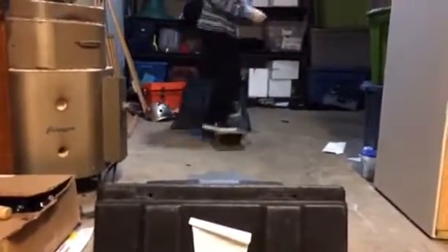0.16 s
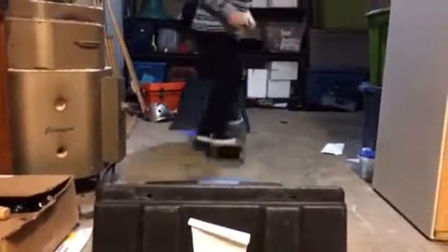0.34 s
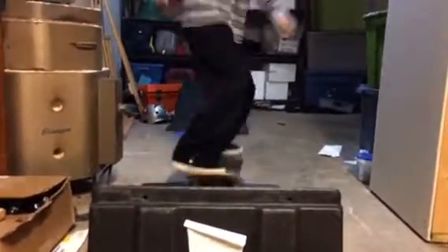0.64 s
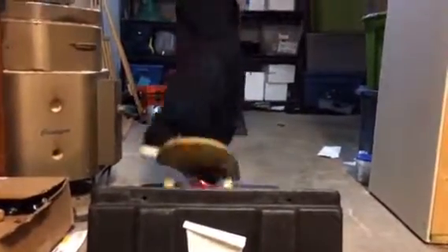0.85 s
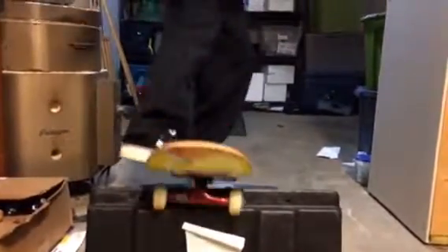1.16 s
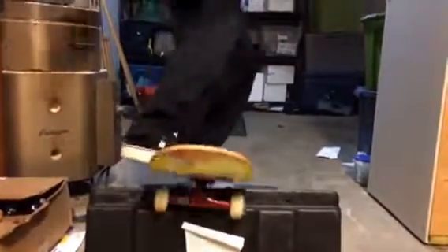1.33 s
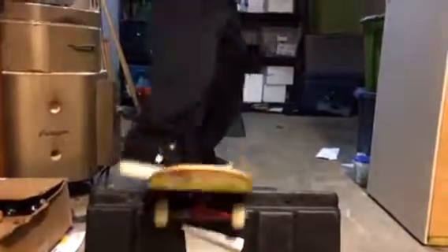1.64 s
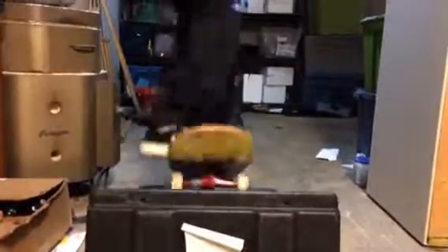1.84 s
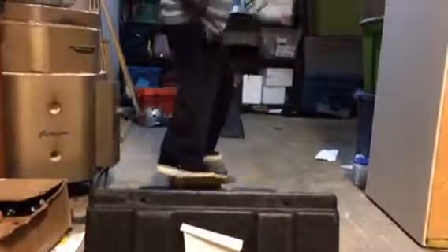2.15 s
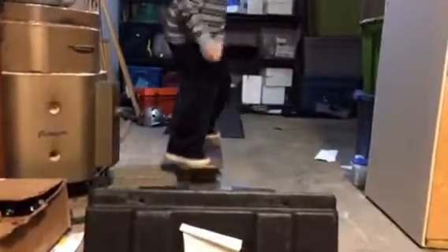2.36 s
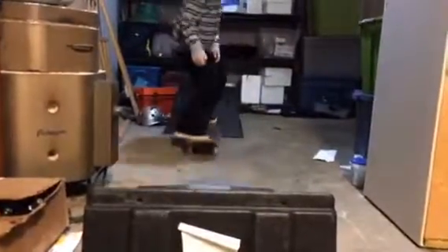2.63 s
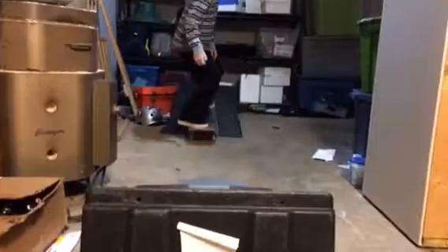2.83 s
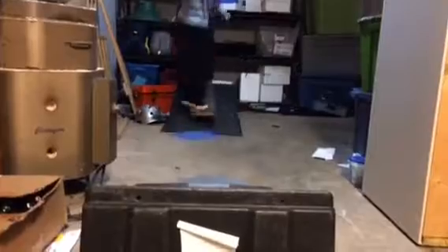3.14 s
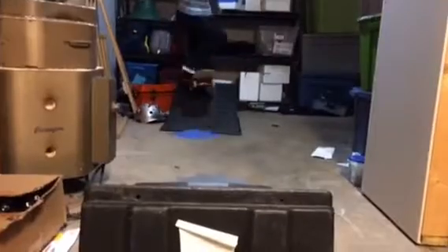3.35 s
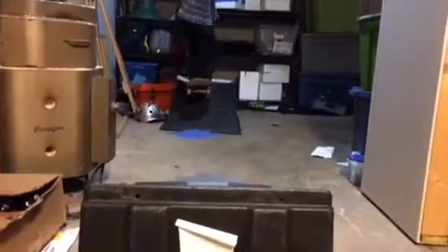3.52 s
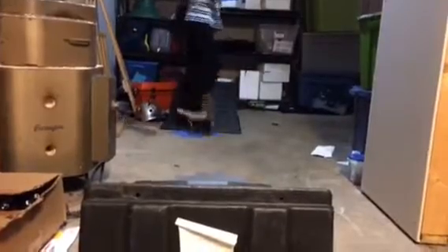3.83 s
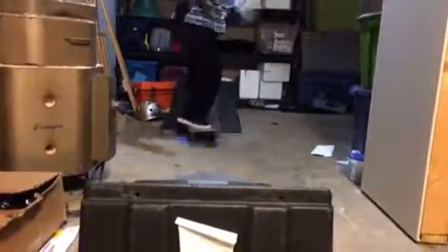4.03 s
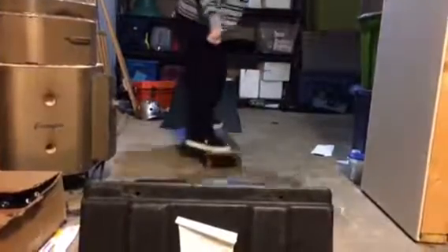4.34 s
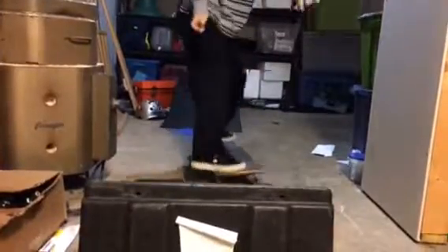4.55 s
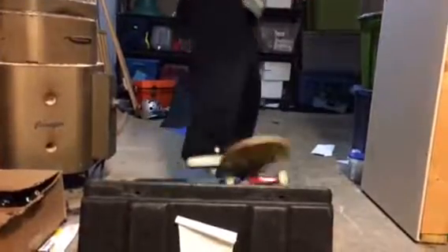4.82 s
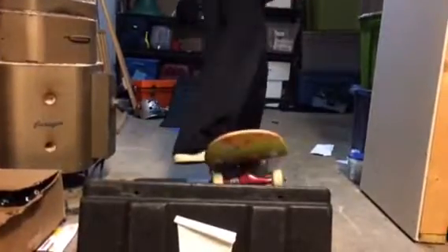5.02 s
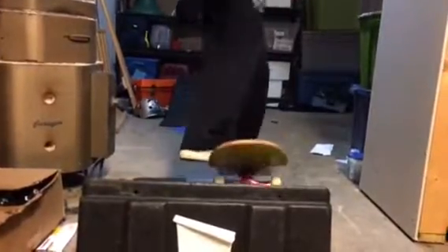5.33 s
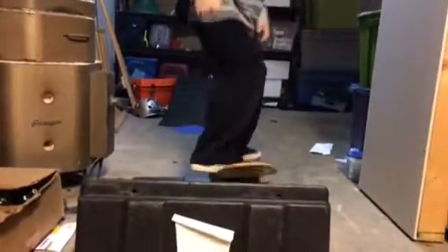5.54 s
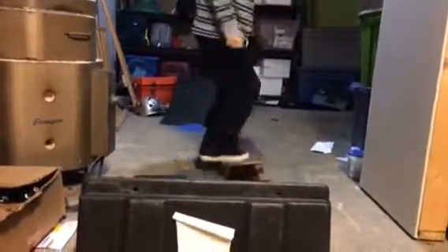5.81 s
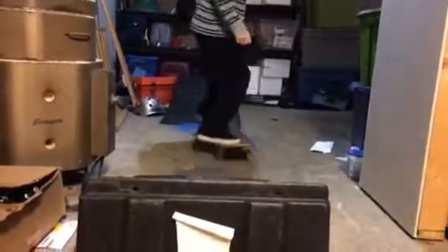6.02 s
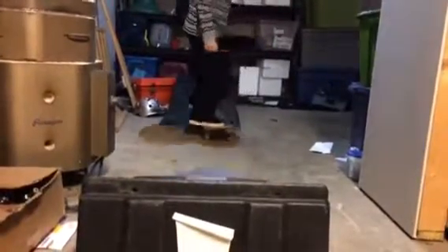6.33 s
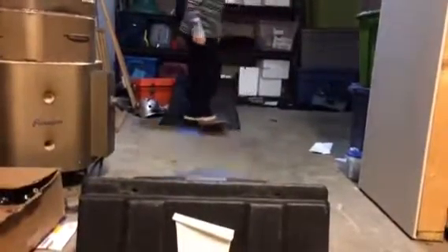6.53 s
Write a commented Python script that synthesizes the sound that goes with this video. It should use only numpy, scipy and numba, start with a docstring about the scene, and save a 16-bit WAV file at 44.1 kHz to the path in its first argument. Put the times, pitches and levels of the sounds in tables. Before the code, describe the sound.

A skateboard rolls between two low hollow ramps in a cluttered storage room, heard on one microphone with a short echo. It starts by rumbling off the far ramp, wheels roaring on concrete and bearings faintly hissing. Axles clack in pairs around 0.2 and 0.7 seconds, and the wheels drum up the near ramp. From 1 to 2 seconds the rolling drops while the deck slaps and thuds through a turn, hardest near 1.6. More clacks follow around 2.3, then a loud rumble and sharp clacks with metallic pings near 3 as it climbs the far ramp. A sharp knock at 3.5 marks the distant turn. The board clacks down at 4, reaches the near ramp around 4.7 and turns with low thumps right by the microphone just after 5. It drums down, clacks at 5.7 and 5.9, and rolls away with a lighter clack at 6.4.

```python
"""A skateboard shuttles between two low hollow ramps in a cluttered storage room, heard on one microphone.
It rumbles off the far ramp some 3.5 m away, wheels roaring on the concrete, bearings hissing. Axles
clack over the lips, the wheels drum up the near ramp and the deck slaps down at the turn. The board
turns again 8 m off, comes back to turn half a metre from the microphone at 5 s, and rolls away.
Throughout, hard blows set the trucks pinging, and the room rings briefly after each knock."""
import sys
import numpy as np
from scipy import signal
from scipy.fft import rfft, irfft
from scipy.io import wavfile
from numba import njit

SR = 44100
rng = np.random.default_rng(int(sys.argv[2]) if len(sys.argv) > 2 else 0)


def generate_wav(signal):
    """Clip the signal to [-1, 1] and save it as 16-bit WAV at the path in sys.argv[1]."""
    frames = np.transpose(np.atleast_2d(signal))
    scaled = np.clip(frames, -1, 1) * 32767
    pcm = np.round(scaled).astype(np.int16)
    wavfile.write(sys.argv[1], SR, pcm)


N = 294147
TIME = np.arange(N) / SR
AGE = TIME[:SR // 2]  # time since a knock

# distance from the microphone to the board: t/s, distance/m
MIC_DISTANCE = [(0, 3.6), (1.1, 2.6), (1.9, 3.6), (3.45, 8), (5.0, 0.44), (5.6, 0.64), (6.67, 8.1)]
# rolling wheels, falling away each time the board stalls on a ramp: t/s, level/dB
ROLLING_LEVEL = [(0, -31), (0.4, -42), (0.85, -32.5), (1.55, -64.5), (1.85, -45.5), (2.35, -42.5),
                 (2.62, -47), (2.79, -28), (3.05, -39), (3.33, -62.5), (3.92, -48.5), (4.18, -33),
                 (4.4, -44), (4.8, -30), (5.33, -79), (5.52, -39), (5.85, -36.5), (6.13, -46),
                 (6.67, -43.5)]
# runs up or down the far ramp: t at lip/s, t at top/s, rumble level/dB
FAR_RAMP_RUNS = [(0.2, 0, -21), (2.991, 3, -13), (4.16, 3.5, -27.5), (6.56, 18.5, -37)]
# runs up or down the near ramp: t at lip/s, t at top/s, drumming level/dB, rumble level/dB
NEAR_RAMP_RUNS = [(0.77, 1.15, -24.5, -27.5), (2.35, 1.93, -19, -24.5), (4.75, 4.97, -21.5, -27.5),
                  (5.92, 5.39, -26.5, -32)]
# spectrum of the rumbling ramps and floor: f/Hz, level/dB
RUMBLE_SPECTRUM = [(20, -33), (50, -5), (75, -7.5), (110, 4), (150, 3), (220, -12), (305, -10), (430, -15),
                   (600, -33), (2000, -59.5)]
# spectrum of the wheels on concrete: f/Hz, level/dB
ROAR_SPECTRUM = [(100, -5.5), (300, 0), (620, 3.5), (1000, -1.5), (1600, -10), (2400, -20), (4000, -31),
                 (15000, -43)]
# spectrum of the bearings and grip tape: f/Hz, level/dB
HISS_SPECTRUM = [(500, -54.5), (1200, -11), (2000, -2.5), (4200, -4), (6300, -8), (8500, -16.5),
                 (12000, -18), (16000, -27.5)]
# swishes of spinning bearings and shoes on the grip: t/s, length/s, level/dB
HISS_SWELLS = [(0.558, 0.085, -43), (0.885, 0.072, -40.5), (1.32, 0.11, -45.5), (2.95, 0.26, -47),
               (3.322, 0.14, -45), (3.529, 0.042, -37), (3.661, 0.032, -45), (4.203, 0.16, -46),
               (4.493, 0.23, -45), (4.839, 0.1, -38.5), (5.205, 0.22, -42.5), (5.612, 0.15, -36),
               (6.028, 0.28, -44.5), (6.562, 0.11, -51)]
# spectrum of a blow to the board: f/Hz, level/dB
KNOCK_SPECTRUM = [(35, -3.5), (70, 8), (150, 9.5), (300, 9.5), (550, 3), (900, -3.5), (1600, -3.5),
                  (2600, -2.5), (4000, -6.5), (6300, -13), (8500, -16), (15000, -21)]
# modes of the deck and trucks: f/Hz, level/dB, t60/s
DECK_MODES = [(240, -2.5, 0.23), (286.3, -9, 0.1), (310, 5, 0.14), (397, 3, 0.057), (649.4, -0.5, 0.14),
              (715, 2, 0.14), (968.6, -1.5, 0.068), (1077, 4.5, 0.072), (1282, -1, 0.14),
              (1570, -32.5, 0.058), (1880, 2, 0.086), (1940, -31.5, 0.088), (2365, -6.5, 0.24),
              (2800, -5.5, 0.27), (3270, 1.5, 0.18), (3830, -1, 0.18), (4900, -38.5, 0.069),
              (5660, -6, 0.088)]
# dull bumps of a wheel on a ramp's surface: t/s, level/dB, weight/dB, thud f/Hz
WHEEL_BUMPS = [(0.002, -28.5, 7, 163), (0.103, -37.5, 11.5, 130), (0.804, -40, 16, 161),
               (0.843, -31, 12.5, 147), (1.301, -41, 7.5, 165.8), (2.239, -37, 20.5, 252),
               (2.3, -39, 11.5, 232), (2.342, -41, 22, 169), (2.42, -38, 17, 133),
               (4.634, -33.5, 12, 113.5), (4.79, -41.5, 22, 204), (4.94, -47, 15.5, 190),
               (5.646, -39.5, 20, 77), (5.869, -45, 19, 272), (5.918, -37.5, 16.5, 97)]
# axles cross a ramp's lip, front then rear; the last one off a ramp carries little weight:
# t/s, level/dB, weight/dB, hardness/dB, thud f/Hz, struck spot f/Hz, direct crack/dB
AXLE_CLACKS = [(0.13, -24.5, 2.5, -6.5, 148.7, 880, -2.5), (0.29, -20.5, -5, -7.5, 140, 587, -1.5),
               (0.652, -21.5, 9.5, -12, 132.6, 970, -2.5), (0.826, -23, 6.5, -13.5, 159.5, 1180, -2.5),
               (2.27, -21, 4, -9.5, 226, 650, -0.5), (2.452, -18.5, -1.5, -9, 143.5, 954, -3),
               (2.812, -23.5, 9, -1, 138, 1530, 0), (3.032, -25.5, 12.5, 0.5, 137.3, 1650, -6),
               (3.985, -16, 3, -2.5, 135, 633, -2.5), (4.189, -20.5, -8.5, -8.5, 142, 1900, -10),
               (4.619, -23.5, 12.5, -7.5, 107, 700, -10), (4.818, -23.5, 9.5, -6, 139, 890, -3),
               (5.69, -26.5, 4, -14, 201, 950, -1.5), (5.945, -23, -3, -6.5, 98, 1400, -11.5),
               (6.414, -30, 10.5, -1.5, 139, 4650, -11)]
# hard blows set an axle or hanger ringing: t/s, f/Hz, level/dB, t60/s
TRUCK_PINGS = [(0.293, 1336, -31, 0.26), (1.646, 2974, -29, 0.076), (2.81, 4250, -33, 0.032),
               (3.032, 4650, -25.5, 0.016), (3.449, 1614, -18.5, 0.02), (5.945, 1420, -30, 0.24),
               (6.414, 4620, -33, 0.025)]
# deck, tail and trucks slap down as the rider turns on a ramp; the row at 3.061 s is a second wheel landing
# just after its axle crosses the far lip: # t/s, level/dB, weight/dB, hardness/dB, thud f/Hz, struck spot f/Hz,
# direct crack/dB
TURN_SLAPS = [(1.031, -35.5, 12, -8, 139, 770, -8), (1.065, -36, 10.5, -9, 116, 950, 11),
              (1.176, -39, 11, 3.5, 117, 1450, -10), (1.202, -28.5, -5, -10, 88, 1360, 3),
              (1.215, -31.5, 17.5, -13.5, 79, 1410, -6), (1.248, -32.5, 17, -4.5, 68.5, 780, 1),
              (1.273, -23.5, 17, -8.5, 166, 765, -2), (1.6429, -20.5, 11, -5.5, 155.5, 3020, -0.5),
              (1.779, -41, 14.5, -3.5, 105, 690, -2.5), (1.836, -26, 18.5, -7.5, 167.2, 800, -13.5),
              (1.846, -26, 14, -0.5, 171, 805, 7), (1.949, -32.5, -1, -12, 111, 1020, -6),
              (1.964, -32, 14.5, -4, 113, 930, 1), (3.061, -30, 8, 1, 140, 1640, 4),
              (3.281, -51.5, -2, -2.5, 130, 1400, -13), (3.4503, -21, 1.5, 0, 150.7, 2840, -5),
              (3.518, -36.5, 14.5, -12, 73, 2640, 0), (3.697, -60.5, 22, 4, 132, 2390, 12),
              (4.302, -30.5, -6, -13.5, 145, 790, -4), (5.097, -34, 15.5, -7.5, 88, 2430, -3.5),
              (5.147, -40.5, -8, -5, 75, 900, 1), (5.174, -27.5, 11, -8.5, 74, 920, 2.5)]

ROOM_T60_S, LATE_T60_S, LATE_DB = 0.24, 0.31, -47.5
ROOM_RUMBLE_DB = -54.5  # the room's low background
FLOOR_RUMBLE_DB, BEARING_DB = -6.5, -22.5  # against the roar of the wheels
THUD_LOW_HZ, THUD_HIGH_HZ = 60.3, 161.4  # a thud's band: no lower than the first, at least to the second
BOOM_T60_S, BOOM_CYCLES = 0.18, 23  # longest boom; cycles in a boom at 140 Hz
HOLLOW_HZ, HOLLOW_DB = 302.8, -5.5  # the ramps' shells favour this part of a knock's body
BODY_PER_HARDNESS = 0.41  # dB of hollow body lost per dB of hardness
CLICK_DB, CLICK_LOSS_DB_PER_M = -2.5, 1  # far contacts lose their top among the shelves
GRAZE_LEAD_S, GRAZE_DB = 0.012, -14.5  # one wheel grazes the lip just before the axle drops
LIP_HZ, RAMP_TOP_HZ = 284, 139  # the near ramp's hollow rings higher towards the thin lip


def undb(db):
    """Decibels to gain."""
    return 10 ** (np.asarray(db) / 20)


def unit(x, size=N):
    """Scale to rms 1 over the first `size` samples."""
    return x / np.sqrt(np.mean(x[:size] ** 2))


def fade(t60):
    """Exponential decay after a knock."""
    return np.exp(-np.log(1000) * AGE / t60)


def add(out, s, sound):
    """Mix a sound in at its time."""
    start = max(int(s * SR), 0)
    out[start:start + len(sound)] += sound[:N - start]


def band(x, lo_hz, hi_hz):
    """Causal band-pass."""
    return signal.sosfilt(signal.butter(3, [lo_hz, hi_hz], "band", fs=SR, output="sos"), x)


def colour(x, spectrum):
    """Minimum-phase filter through points of f/Hz, level/dB."""
    size = 4096
    hz, db = np.transpose(spectrum)
    bin_db = np.interp(np.log(np.fft.rfftfreq(size, 1 / SR) + 1), np.log(hz), db)
    cepstrum = irfft(np.log(undb(bin_db)))
    cepstrum[1:size // 2] *= 2
    cepstrum[size // 2 + 1:] = 0
    return signal.fftconvolve(x, irfft(np.exp(rfft(cepstrum))))[:len(x)]


@njit
def resonate(x, hz, damping):
    """State-variable band-pass with a moving centre."""
    out, band_state, low_state = np.empty(len(x)), 0., 0.
    for i in range(len(x)):
        g = np.tan(np.pi * hz[i] / SR)
        passed = (band_state + g * (x[i] - low_state)) / (1 + g * (g + damping))
        band_state = 2 * passed - band_state
        low_state += 2 * g * passed
        out[i] = damping * passed
    return out


def walk(rate):
    """Smooth random wander with a spread near 1."""
    return np.interp(TIME * rate, np.arange(N), rng.standard_normal(N))


def grains(rate, spread_db):
    """Tiny random impacts of uneven size, `rate` a second."""
    sizes = undb(spread_db * np.minimum(rng.exponential(size=N), 4))
    return (rng.random(N) < rate / SR) * sizes * rng.standard_normal(N)


def near_echoes(x, gain, count):
    """Echoes off the floor and nearest boxes reach the microphone a few ms late and ripple the spectrum."""
    out = x.copy()
    for lag, sign in zip(rng.integers(20, 260, count), rng.choice([-1, 1], count)):
        out[lag:] += gain * sign * x[:-lag]
    return out


def moving_echoes(x, gain, count):
    """Near echoes of a source on the move: their lags wander, so the ripple keeps shifting."""
    paths = (TIME - rng.uniform(.001, .006) - .00015 * walk(6.8) for _ in range(count))
    return x + gain * sum(x[np.clip((path * SR).astype(int), 0, N - 1)] for path in paths)


def climb(lip_s, top_s):
    """Place of the board on a ramp: 0 at the lip, 1 at the top."""
    return np.clip((TIME - lip_s) / (top_s - lip_s), 0, 1)


def run_gain(lip_s, top_s, db, climb_db, edge_s=0.007):
    """A run is loudest at the lip, where the board is fastest, and fades quickly beyond its ends."""
    outside_s = np.abs(TIME - np.clip(TIME, min(lip_s, top_s), max(lip_s, top_s)))
    return undb(db + climb_db * climb(lip_s, top_s)) * np.exp(-outside_s / edge_s)


def rolling_db():
    """Level of the rolling wheels through time."""
    return np.interp(TIME, *np.transpose(ROLLING_LEVEL))


def rolling_wheels():
    """Grit under the wheels shakes the floor and the board; the ramps rumble more than the concrete."""
    rumble = unit(colour(grains(rate=790, spread_db=3.5), RUMBLE_SPECTRUM))
    grit = moving_echoes(grains(rate=3900, spread_db=0.5), gain=0.38, count=3)
    roar = unit(colour(grit, ROAR_SPECTRUM)) * undb(rolling_db() + 0.13 * walk(32))
    near = sum(run_gain(lip_s, top_s, db, climb_db=-2.5) for lip_s, top_s, _, db in NEAR_RAMP_RUNS)
    far = sum(run_gain(lip_s, top_s, db, climb_db=-24) for lip_s, top_s, db in FAR_RAMP_RUNS)
    floor = undb(rolling_db() + FLOOR_RUMBLE_DB)
    return rumble * (near + far + floor + undb(ROOM_RUMBLE_DB)) + roar


def bearing_hiss(attack_s=0.049, release_t60_s=0.25):
    """Ticks of bearing balls and grip tape merge into a hiss: faint while rolling, swelling in swishes."""
    ticks = moving_echoes(grains(rate=14000, spread_db=5.0), gain=0.35, count=4)
    gain = undb(rolling_db() + BEARING_DB)
    for s, length_s, db in HISS_SWELLS:
        attack = np.clip((TIME - s) / attack_s, 0, 1)
        release = np.exp(-np.log(1000) * np.maximum(TIME - s - length_s, 0) / release_t60_s)
        gain += undb(db) * attack * release
    flicker = undb(0.86 * walk(22))
    return unit(colour(ticks, HISS_SPECTRUM)) * gain * flicker


def deck_ring(scatter_db=4.0, detune=0.0095):
    """Deck and trucks ring; each blow lands elsewhere on the board and favours other modes."""
    ring = np.zeros(len(AGE))
    for hz, db, t60 in DECK_MODES:
        strength, pitch, polarity = rng.standard_normal(3)
        mode = np.sign(polarity) * np.sin(2 * np.pi * hz * (1 + detune * pitch) * AGE)
        ring += undb(db + scatter_db * strength) * mode * fade(t60)
    return ring


def clatter(tone_hz, crack_db, ring_db=-9.5, rattle_db=-6):
    """One contact: a direct crack, loose trucks rattling, the deck's ring, reflections off the shelves."""
    rise_s = 0.0027 * undb(-.6 * min(crack_db, 0))  # a glancing blow builds up slowly
    swell = 1 - np.exp(-AGE / rise_s)
    room_decay = fade(ROOM_T60_S) + undb(LATE_DB) * fade(LATE_T60_S)
    reflections = unit(rng.standard_normal(len(AGE)) * swell * room_decay)
    crack = unit(signal.unit_impulse(len(AGE), 30) + 0.45 * rng.standard_normal(len(AGE)) * fade(0.011))
    rattle = sum(np.roll(crack, lag) * fade(ROOM_T60_S)[lag] for lag in rng.integers(150, 1900, 3))
    ring = unit(deck_ring() * swell)
    blow = near_echoes(reflections + undb(crack_db) * crack + undb(rattle_db) * rattle, gain=0.33, count=4)
    hit = unit(colour(blow, KNOCK_SPECTRUM)) + undb(ring_db) * ring
    struck_spot = resonate(hit, np.full(len(AGE), float(tone_hz)), damping=0.072)
    return hit + struck_spot


def boom(hz, rise_s=0.0096):
    """The loaded board and ramp bounce at a low pitch that builds up over a cycle or two."""
    t60 = min(BOOM_T60_S, BOOM_CYCLES / hz * (hz / 140) ** 1.7)  # deep booms are damped harder
    swell = (1 - np.exp(-AGE / rise_s)) ** 1.36
    return unit(np.sin(2 * np.pi * hz * AGE) * swell * fade(t60))


def knock(s, db, weight_db, hardness_db, thud_hz, tone_hz, crack_db, body_db, boom_db):
    """Weight brings thud and body; hardness trades body for bite and click; distance dulls the click."""
    hit = clatter(tone_hz, crack_db)
    diffuse_thud = band(hit, max(0.55 * thud_hz, THUD_LOW_HZ), max(1.255 * thud_hz, THUD_HIGH_HZ))
    thud = undb(2.5) * unit(diffuse_thud) + undb(boom_db) * boom(thud_hz)
    body = band(hit, 159.4, 523)
    body += undb(HOLLOW_DB) * resonate(body, np.full(len(AGE), HOLLOW_HZ), damping=0.13)
    clack, bite, click = band(hit, 723, 1740), band(hit, 2000, 5500), band(hit, 5500, 19000)
    distance_m = np.interp(s, *np.transpose(MIC_DISTANCE))
    parts = [(thud, weight_db),
             (body, weight_db + body_db - BODY_PER_HARDNESS * hardness_db),
             (clack, 0),
             (bite, hardness_db),
             (click, CLICK_DB + hardness_db - CLICK_LOSS_DB_PER_M * distance_m)]
    return sum(undb(db + part_db) * unit(x, size=1400) for x, part_db in parts)


def wheel_bumps():
    """Wheels bump dully along the hollow ramps."""
    out = np.zeros(N)
    for s, db, weight_db, thud_hz in WHEEL_BUMPS:
        add(out, s, knock(s, db, weight_db, hardness_db=-9, thud_hz=thud_hz, tone_hz=970,
                          crack_db=-2, body_db=-6, boom_db=2))
    return out


def axle_clacks():
    """One wheel grazes a ramp's lip, then the whole axle drops over it."""
    out = np.zeros(N)
    for s, db, weight_db, hardness_db, thud_hz, tone_hz, crack_db in AXLE_CLACKS:
        lip = dict(hardness_db=hardness_db, thud_hz=thud_hz, tone_hz=tone_hz, body_db=-4, boom_db=8.5)
        add(out, s, knock(s, db, weight_db, crack_db=crack_db, **lip))
        add(out, s - GRAZE_LEAD_S, knock(s, db + GRAZE_DB, weight_db=0.5, crack_db=-12.5, **lip))
    return out


def truck_pings():
    """A truck rings in a tight cluster of modes that beat against each other and die quickly."""
    out = np.zeros(N)
    for s, hz, db, t60 in TRUCK_PINGS:
        detune, phase = rng.uniform(-1, 1, (2, 4, 1))
        cluster = np.sin(2 * np.pi * hz * (1 + 0.048 * detune) * AGE + np.pi * phase).sum(axis=0)
        add(out, s, undb(db) * unit(cluster * fade(t60), size=600))
    return out


def ramp_drumming():
    """Wheels drum on the near ramp; its resonance slides as they climb, and the shell booms below."""
    out = np.zeros(N)
    for lip_s, top_s, db, _ in NEAR_RAMP_RUNS:
        centre_hz = LIP_HZ + (RAMP_TOP_HZ - LIP_HZ) * climb(lip_s, top_s)
        bumps = grains(rate=500, spread_db=1.0)
        hollow = unit(resonate(resonate(bumps, centre_hz, damping=0.31), centre_hz, damping=1.0))
        shell = undb(-3.5) * unit(band(bumps, 52, 88))
        swell = undb(-1.8 * walk(14))  # the rider's weight shifts
        out += run_gain(lip_s, top_s, db, climb_db=-7.5) * unit(hollow + shell) * swell
    return out


def turn_slaps():
    """Deck, tail and trucks slap down on a ramp as the rider turns round; one further blow is a second wheel
    landing just after its axle crosses the far lip."""
    out = np.zeros(N)
    for s, *blow in TURN_SLAPS:
        add(out, s, knock(s, *blow, body_db=-12, boom_db=1))
    return out


def scene():
    """At the microphone, in mono: knocks and ringing trucks over the rolling wheels."""
    knocks = axle_clacks() + turn_slaps() + wheel_bumps()
    return (knocks + truck_pings() + rolling_wheels() + bearing_hiss() + ramp_drumming())[None]


def record(dry):
    """The microphone loses the deep bass; the recorder rounds the highest peaks and cuts the top."""
    bass_cut = signal.butter(2, 28, "high", fs=SR, output="sos")
    top_cut = signal.ellip(10, .2, 80, 15500, fs=SR, output="sos")
    mic = signal.sosfilt(bass_cut, dry)
    rounded = mic / (1 + mic ** 6) ** (1 / 6)
    return signal.sosfilt(top_cut, rounded)


dry = scene()
out = record(dry)
generate_wav(out)
```